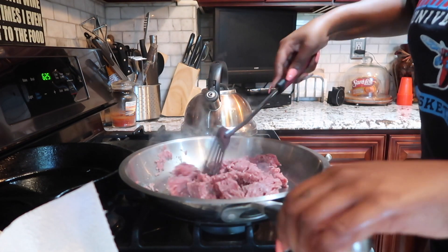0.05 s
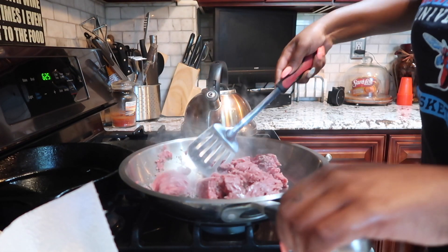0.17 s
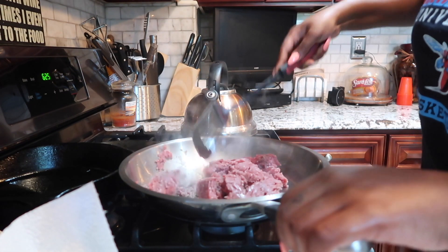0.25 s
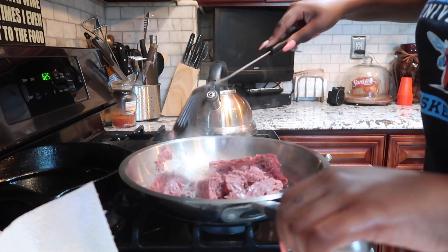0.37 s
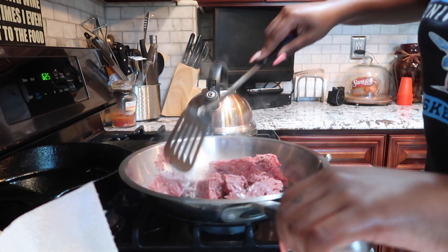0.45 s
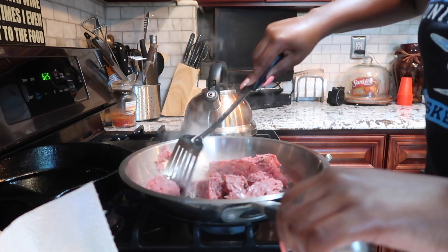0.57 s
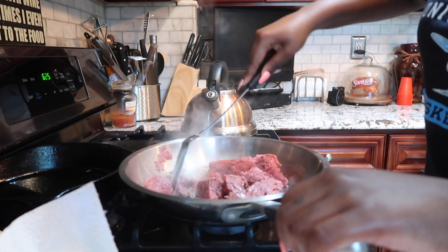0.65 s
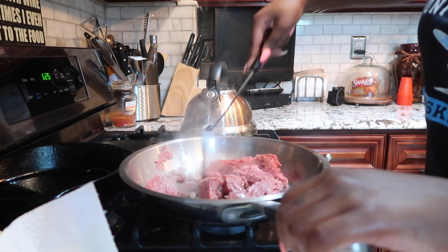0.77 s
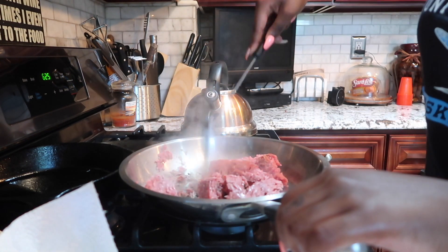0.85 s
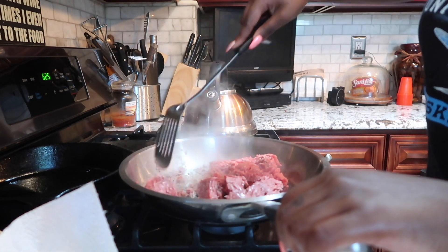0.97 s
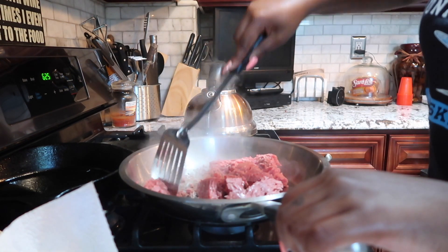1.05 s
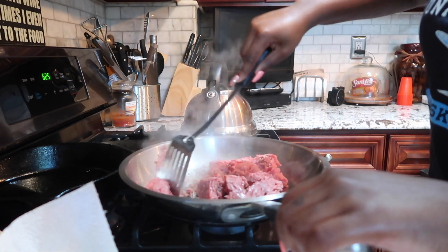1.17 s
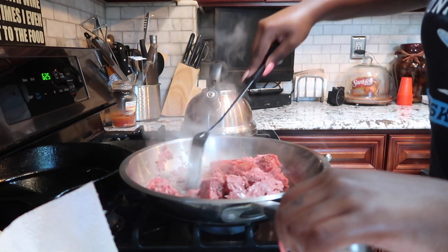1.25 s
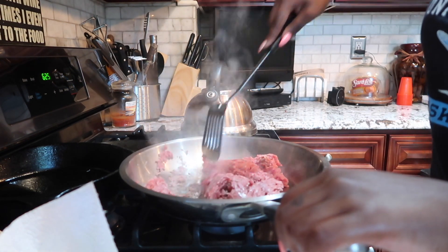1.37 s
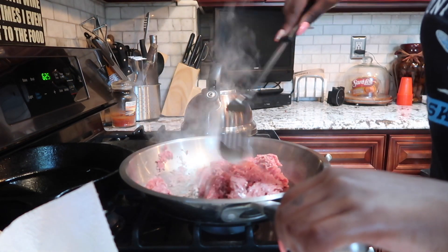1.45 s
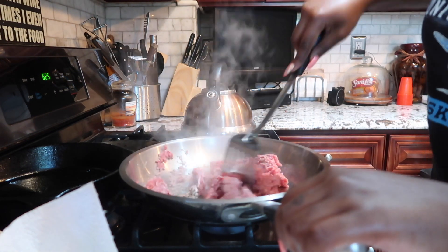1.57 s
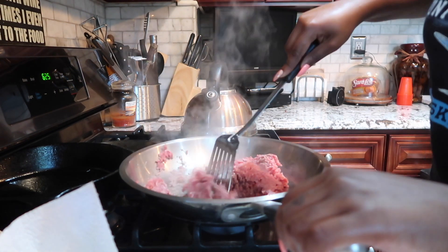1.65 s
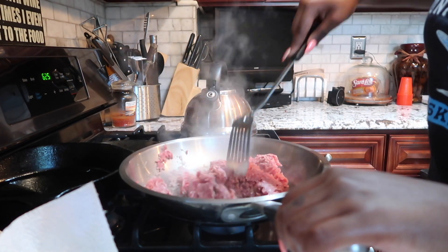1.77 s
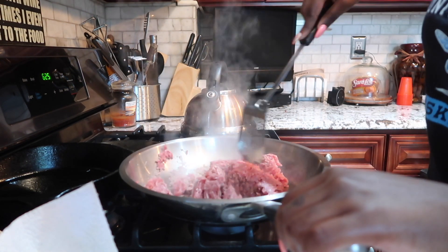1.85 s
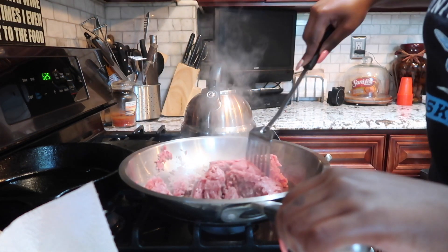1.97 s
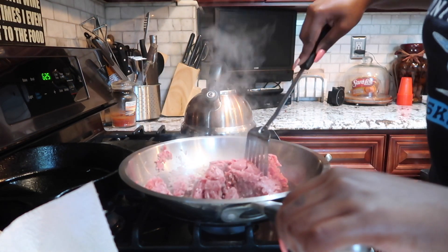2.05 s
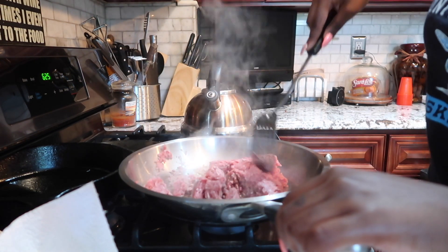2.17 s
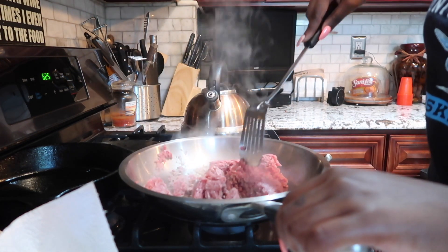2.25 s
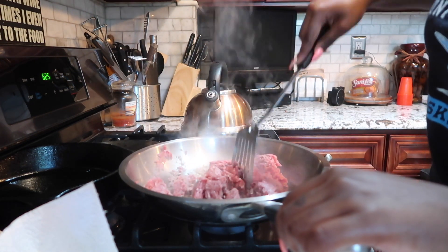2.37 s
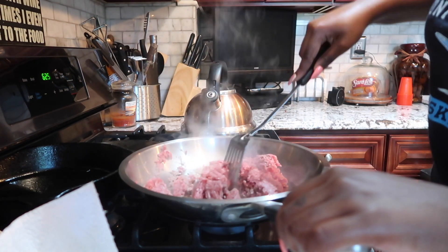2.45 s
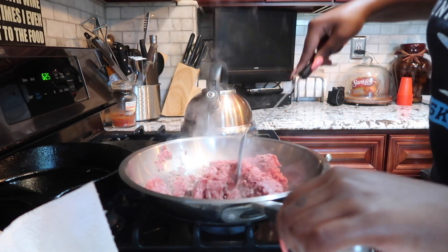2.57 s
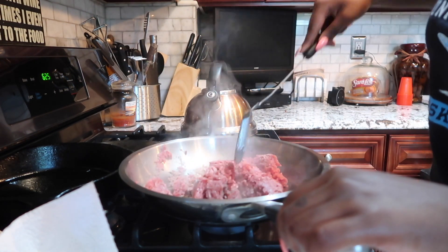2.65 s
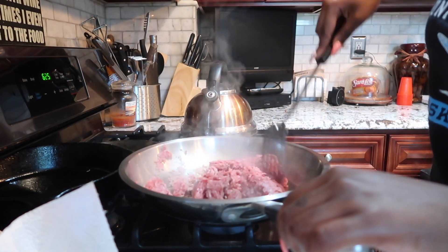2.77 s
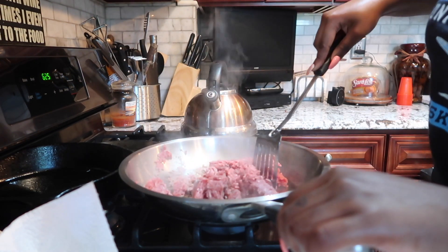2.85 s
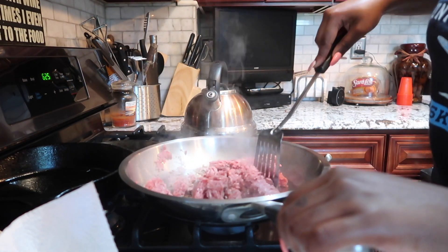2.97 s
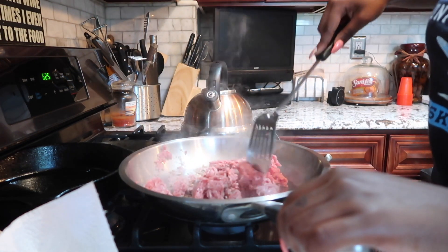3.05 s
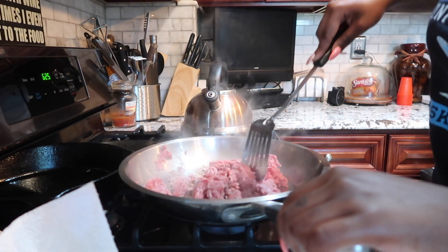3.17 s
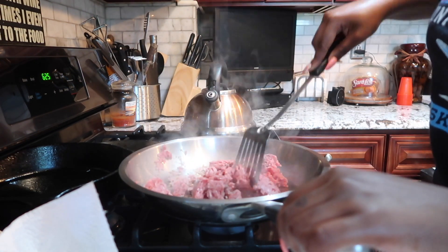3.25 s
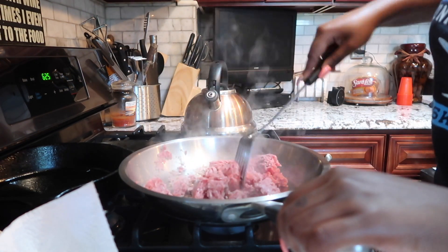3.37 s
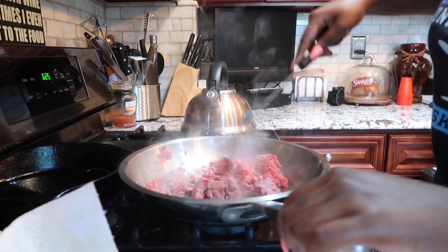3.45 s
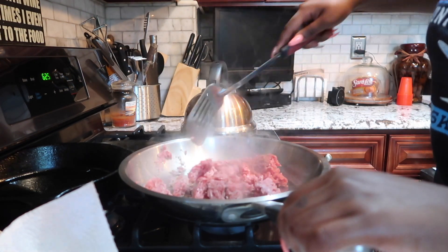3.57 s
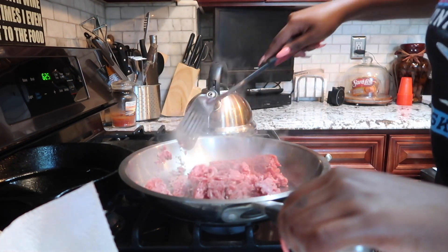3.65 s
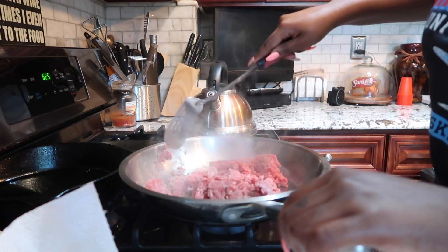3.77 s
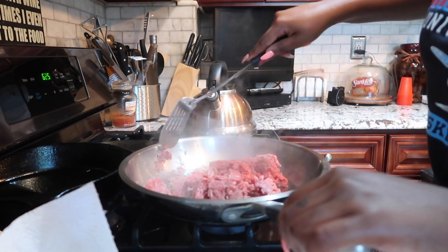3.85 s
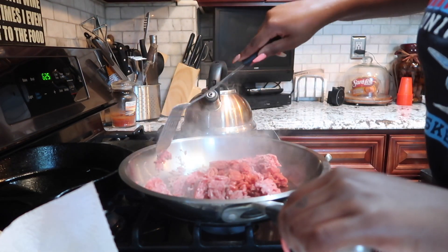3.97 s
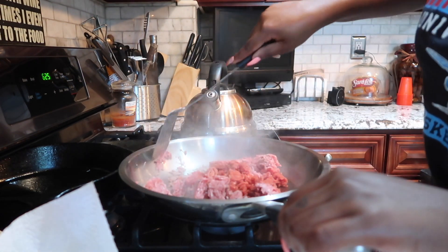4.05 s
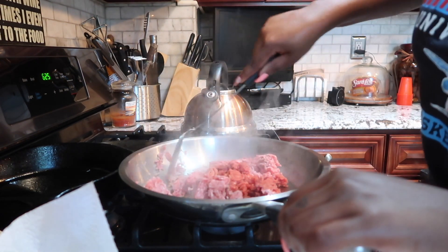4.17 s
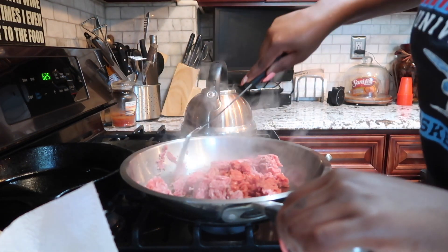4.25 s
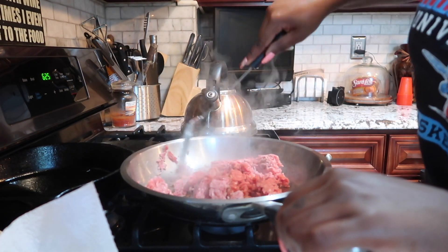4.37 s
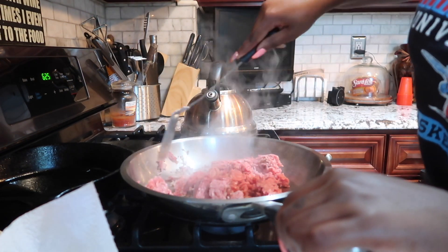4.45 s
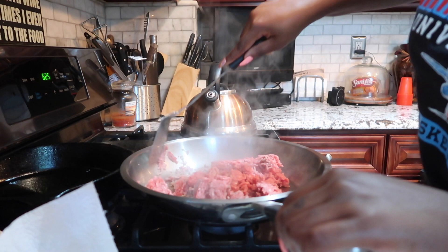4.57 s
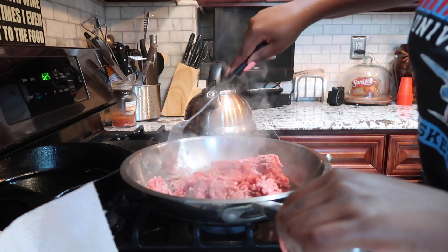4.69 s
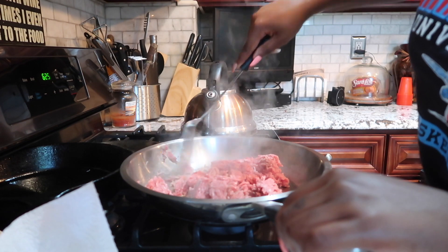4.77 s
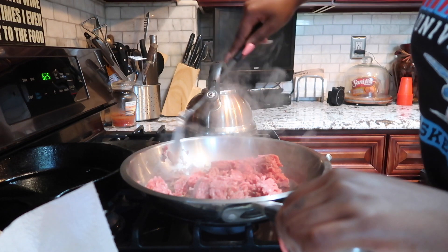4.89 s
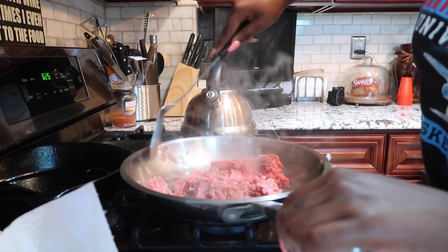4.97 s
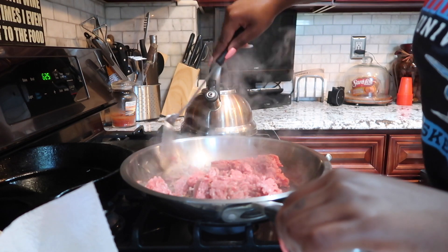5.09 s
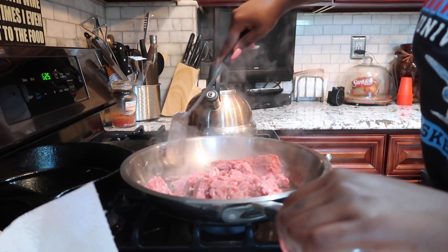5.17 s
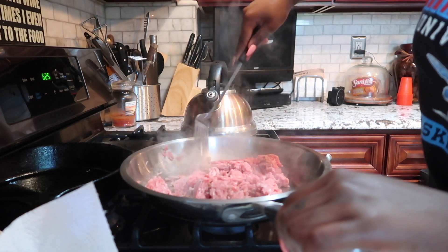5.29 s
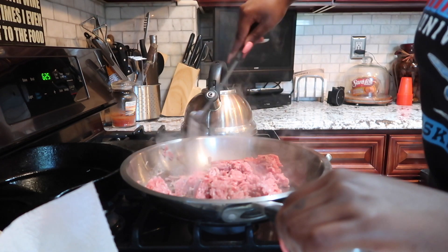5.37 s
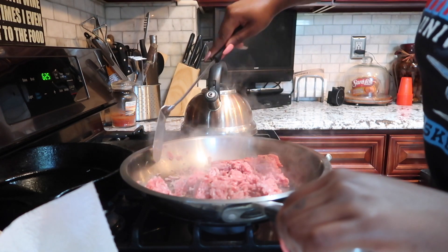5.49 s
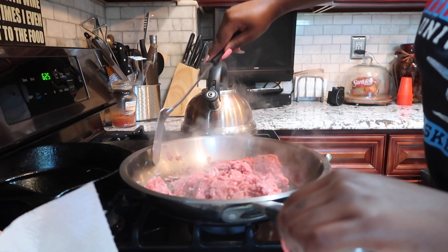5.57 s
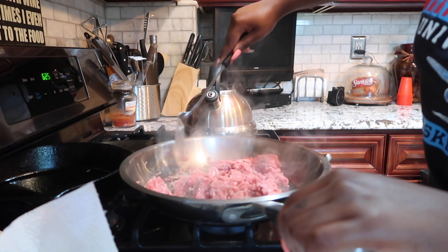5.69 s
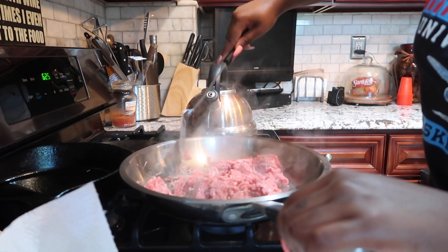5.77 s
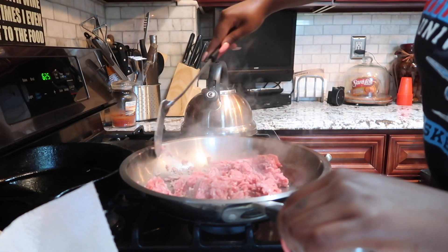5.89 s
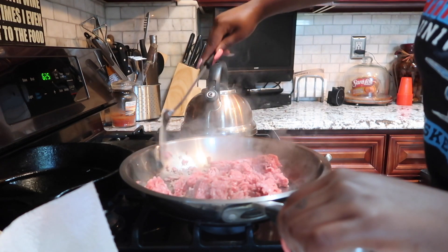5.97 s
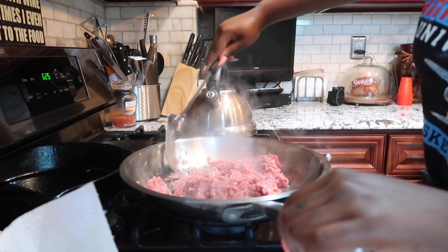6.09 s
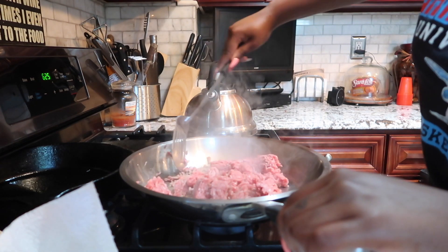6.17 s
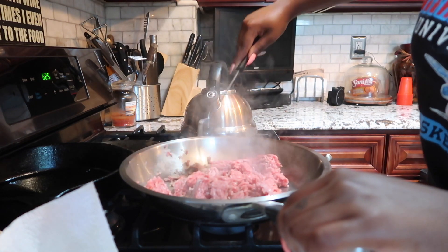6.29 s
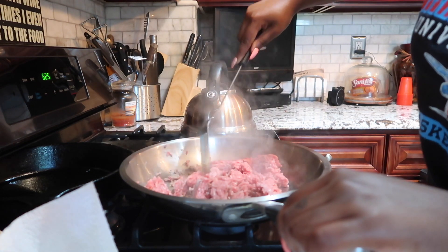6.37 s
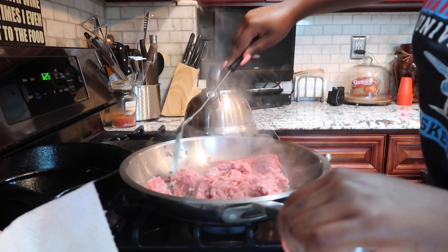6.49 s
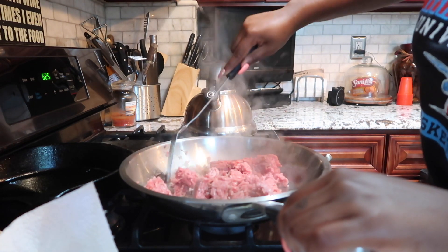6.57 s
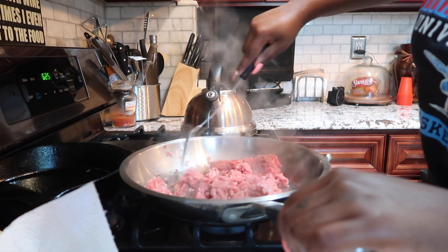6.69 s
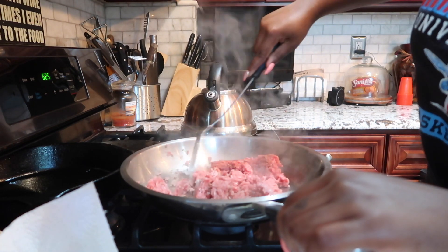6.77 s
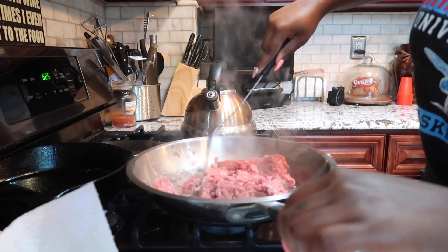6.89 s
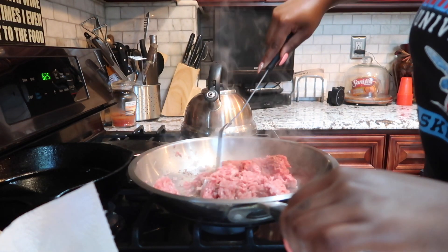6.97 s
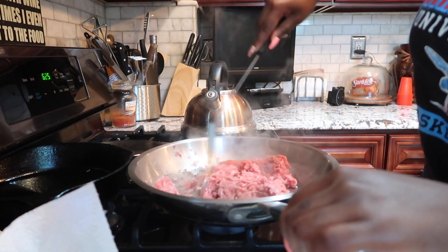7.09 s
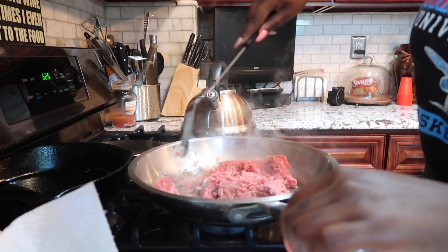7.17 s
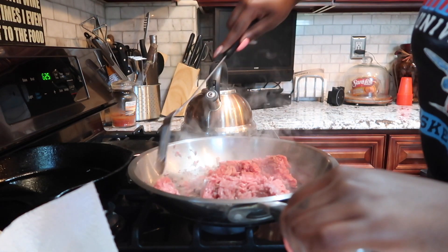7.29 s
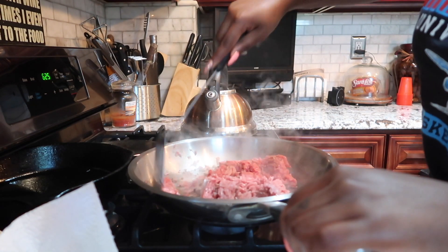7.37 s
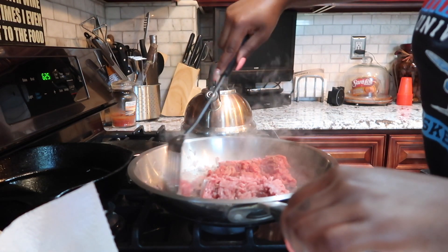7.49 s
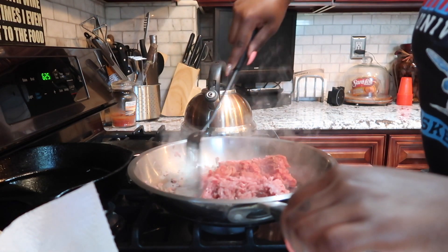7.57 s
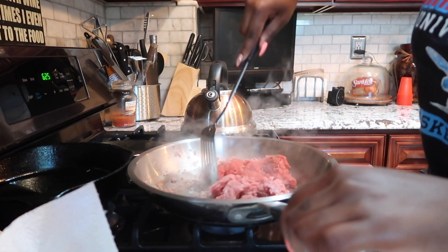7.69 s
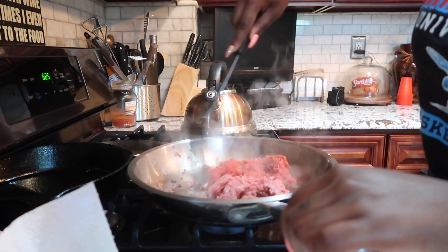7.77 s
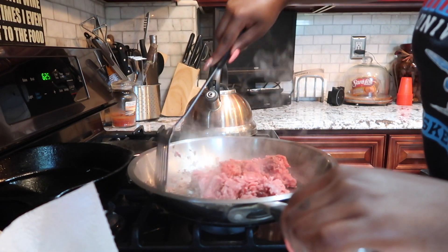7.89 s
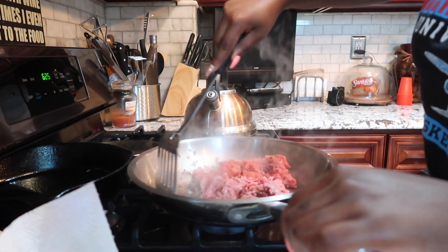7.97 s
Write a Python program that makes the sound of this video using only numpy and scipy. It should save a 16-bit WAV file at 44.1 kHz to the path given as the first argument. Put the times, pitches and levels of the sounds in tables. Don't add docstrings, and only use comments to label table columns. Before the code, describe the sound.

Close up in a home kitchen, ground meat fries with a dense, bright, crackling sizzle. A slotted metal spatula opens with a thuddy knock, chops softly into the meat, then clangs loudly on the steel pan wall and bottom. Lighter rim taps follow, then a short juddering scrape and two full knocks. A low stove rumble lies underneath; the microphone overloads on the hardest hits and the sizzle dips after them.

```python
import sys
import numpy as np
from scipy import signal
from scipy.fft import rfft, irfft
from scipy.io import wavfile
from scipy.ndimage import uniform_filter1d

SR = 44100
rng = np.random.default_rng(int(sys.argv[2]) if len(sys.argv) > 2 else 0)


def store_pcm(level_fs):
    pcm = np.round(np.clip(level_fs, -1, 1) * 32767).astype(np.int16)
    wavfile.write(sys.argv[1], SR, np.atleast_2d(pcm).T)


N = 353968

# [t/s, frying level/dB, brightness/(dB per octave), stirring level/dB]
FRYING = [(0.0, 1, -2, 11), (.3, 0.7, 0.6, -4), (.7, 1, 0.6, 0), (1.1, 0, 0.5, -1.5), (1.6, 0.4, 1, -2),
          (2.3, 0.2, 0.5, -0.2), (3.3, -0.1, 0.2, -2), (4.0, .1, 0.4, -1.5), (4.7, 0.4, 0, 1.5),
          (5.5, -1.2, 0.6, -1), (6.2, 1.5, .1, -1.5), (6.9, -1.4, 0, 4), (7.4, -0.4, -0.3, 0.3),
          (8.03, 1.9, -0.4, 1)]
# [f/Hz, level/dB per Hz]
SIZZLE_SPECTRUM = [(500, -30), (850, -23), (1060, -9.5), (1380, -13.5), (1780, -3), (1990, -4), (2300, 1),
                   (2760, -1), (3570, -1), (8670, -15), (12500, -18.5), (14400, -20), (15500, -34)]

# [t/s, peak level/dB, depth of thud/dB, wall ring f/Hz, blade ring f/Hz]
BOTTOM_BLOWS = [
    (0.0, -7.5, 9, 1360, 2230),
    (2.039, -6, -26, 1450, 2870),
    (2.052, -7, -28, 1940, 2880),
    (2.5, -4, -10, 1350, 2920),
    (2.897, 0.2, -41, 1440, 2360),
    (3.406, -20.5, 4, 1370, 2670),
    (7.514, -14.5, -17, 1520, 2660),
]
MEAT_BLOWS = [
    (0.391, -13.5, -24, 1630, 2380),
    (0.565, -13.5, -15, 2090, 2360),
    (0.639, -12.5, 1, 2110, 2560),
    (0.768, -16, -7, 1680, 2330),
    (1.349, -20, 3, 1440, 3010),
    (1.646, -10, -23, 1700, 2400),
    (5.608, -19, -2.1, 2040, 2110),
    (6.729, -18.5, -15, 1860, 2760),
]
WALL_BLOWS = [
    (0.831, -4, -6, 1750, 2700),
    (1.187, -0.5, -11, 2090, 2260),
    (1.663, 6, -27, 1757, 2600),
    (6.638, 0.5, -1, 1800, 2280),
    (7.007, 2, -0.5, 1736, 2240),
    (7.646, -14.5, -9, 1740, 2400),
]
SLOPE_BLOWS = [
    (6.01, -19, -20, 1770, 2370),
    (6.189, -15, -16, 1790, 2660),
    (6.318, -10, -31, 1860, 2180),
    (6.351, -5, -20, 1788, 2210),
    (6.387, -10.5, -14, 1925, 2520),
]
RIM_BLOWS = [
    (4.111, -15, -24, 1285, 3160),
    (4.254, -11.5, -6, 1370, 2560),
    (4.655, -6.5, -7, 1270, 2350),
    (5.087, -1, -33, 1984, 2940),
    (7.488, -6, -17, 1556, 2730),
    (8.017, -7.5, 0, 1250, 2620),
]
BLOWS = dict(bottom=BOTTOM_BLOWS, meat=MEAT_BLOWS, wall=WALL_BLOWS, slope=SLOPE_BLOWS, rim=RIM_BLOWS)
LANDINGS = {"bottom": [(520, 685, 3480, 4720), (-3, -4.5, 2.5, 1.1, -8), (-4, -6, .021, 0.72)],
            "meat": [(270, 740, 3600, 4850), (-14, -13, 6, -4.5, -13), (-11, -3, 0.03, 0.5)],
            "wall": [(500, 660, 3400, 4670), (-7.5, -2.5, 0.2, -2, -8), (-6.5, -2.5, 0.02, 0.52)],
            "slope": [(470, 660, 3660, 4400), (-29, 7, -11, 1.5, -17), (-7, -1.5, 0, 0.74)],
            "rim": [(480, 1080, 3650, 4650), (-25.5, 0.5, 3, 0, -5.5), (-6.5, -2.5, 0.0335, 0.78)]}
# [f/Hz, level/dB, t60/s]
PAN_MODES = [(164, -9, 0.28), (240, -2, 0.058), (338.3, 0, 0.74), (490, -15.5, 0.66), (531, -0.5, 0.7),
             (645, 0.5, 0.83), (684, -5, 1), (873, 0.5, 0.25), (1100, -36, 0.17), (1350, -13, 0.25),
             (1337, -4, 0.62), (1424, 0.5, 0.76), (1650, -25, 0.04), (1756, 4.5, .22), (1810, 5.5, 0.33),
             (2090, -7.5, 0.041), (2292, 6.5, 0.16), (2435, -10, 0.073), (2700, -18.5, 0.067),
             (2670, -6.5, 0.43), (3010, 8, 0.1), (3070, -23, 0.083), (3310, 7.5, 0.079), (3340, 2, 0.11),
             (3520, 12.5, 0.033), (4100, 9, 0.35), (4690, -15, 0.16), (5390, 5.5, 0.29), (6790, 3, 0.061),
             (6800, -25, 0.22)]
PLACE_T60 = [0.11, 0.14, 0.53, 0.12, 0.24, 0.23]
# [f/Hz, level/dB per Hz]
CRACK_SPECTRUM = [(150, 4.5), (500, -18), (1500, 0.5), (3200, -1.5), (6000, -6), (12000, -33), (16000, -44)]
# [t/s, level/dB]
DRAGS = [
    [(0.5, -44), (0.668, -25), (0.678, -16), (0.722, -47), (0.776, -34), (0.82, -41)],
    [(5.7, -52), (5.73, -23), (5.918, -43), (6.008, -37), (6.016, -26.5), (6.186, -31.5), (6.204, -21.5),
     (6.31, -32)],
    [(7.55, -21), (7.564, -34), (7.666, -27.5), (7.776, -33), (7.78, -41)],
]
# [t/s, level/dB]
RASP_LEVEL = [
    (6.3, -36),
    (6.312, -47),
    (6.32, -22),
    (6.336, -21),
    (6.354, -14.5),
    (6.45, -37),
]
# [f/Hz, level/dB]
JUDDER_MODES = [(660, -7.5), (1370, -9), (1790, 2), (1950, 1.5), (2160, -3), (3380, -8), (3680, 0)]

# [f/Hz, level/dB per Hz]
STOVE_SPECTRUM = [(53, -39), (90, -2), (129, -10), (178, -1), (221, -3), (255, -0.5), (368, -7),
                  (668, -0.5), (839, -7.5), (1200, -1.5), (1560, -6.5), (2640, -120)]
# [f/Hz, level/dB, t60/s]
HUM_MODES = [(172, -6.5, 0.21), (261.4, -7, 0.36), (343.5, -7.5, 0.21), (519.5, -6.5, 0.18),
             (682.3, -1, 0.19), (1056, -5, 0.54)]
# [f/Hz, side minus mid level/dB]
PORT_WIDTH = [(60, -33), (110, -36), (200, -19.5), (380, -18.5), (700, -20.5), (1290, -19.5), (2380, -21.5),
              (4400, -7), (8120, 1.5), (15000, 3)]
# [t/s, gain it falls to/dB]
DUCKS = [(0.0, -29.5), (.835, -27), (1.19, -30), (1.668, -42.5), (2.045, -40.5), (2.505, -40.5), (2.9, -42),
         (4.66, -30), (5.091, -35), (6.355, -27.5), (6.64, -29), (7.01, -35.5)]

KITCHEN_T60_S, KITCHEN_DB = 0.3, -11.5
DUCK_S, CREEP_DB_PER_S = 0.026, 7
HUM_DB, RUMBLE_DB = -15.5, -31.5
JOLT_HUM_DB, JOLT_HUM_S, JOLT_RUMBLE_DB, JOLT_RUMBLE_S = -34, 0.087, -47, 0.025


def sizzle(bright_db, per_s, spread_db, steam, patchy_db):
    out, gust = np.zeros((2, N)), drift(9.0)
    edges = 600 * 2 ** np.arange(0, 4.9, 1 / 3)
    bursts = grains(per_s * from_db(1.5 * gust), spread_db)
    dealt = rng.integers(0, 3, N)
    signs = rng.choice([-1, 1], (2, N))
    hiss = rng.standard_normal((2, 2, N))
    for k, (low, high) in enumerate(zip(edges, edges[1:])):
        force = np.sqrt(3) * bursts * (dealt == k % 3) * signs + steam * hiss[k % 2]
        hz = np.sqrt(low * high)
        tilt_db = bright_db * np.log2(hz / 3000)
        gain_db = at_hz(SIZZLE_SPECTRUM, hz) + tilt_db + patchy_db * (0.1 * gust + drift(29.0))
        out += from_db(gain_db) * band_pass(force, low, high)
    return two_ports(*out) / np.std(out[0])


def spits(per_s, cycles):
    pitches, dealt = np.geomspace(2000, 14000, 22), rng.integers(0, 22, N)
    clicks = grains(per_s, 3.24) * rng.choice([-1, 1], (2, N))
    out = np.zeros((2, N))
    for k, hz in enumerate(pitches):
        out += from_db(at_hz(SIZZLE_SPECTRUM, hz)) * hz * ring(clicks * (dealt == k), hz, cycles / hz)
    return two_ports(*out) / np.std(out[0])


def spatula(gain_db, scrape_db):
    t, out = np.arange(round(0.3 * SR)) / SR, np.zeros(N + SR)
    gain_db = np.r_[gain_db, np.full(SR, gain_db[-1])]
    for place, rows in BLOWS.items():
        for row in rows:
            i = round(row[0] * SR)
            span = slice(i, i + len(t))
            out[span] += blow(t, row, LANDINGS[place], others_db=-6) * from_db(gain_db[span] - gain_db[i])
    sound = out[:N] + from_db(scrape_db) * scrape()
    return signal.sosfilt(signal.butter(3, 270, "highpass", fs=SR, output="sos"), sound)


def blow(t, row, landing, others_db):
    _, db, thud_db, wall_hz, blade_hz = row
    place_hz, place_db, (crack_db, chatter_db, chatter_s, kept) = landing
    chance, rough = rng.standard_normal((2, len(PAN_MODES))), rng.standard_normal(len(t))
    own_hz = [*place_hz[:2], wall_hz, blade_hz, *place_hz[2:]]
    own_db = [thud_db, *place_db]
    place = [(0.9 * own_hz[0], own_db[0] - 3), *zip(own_hz, own_db)]

    pan_hz, pan_db, pan_t60 = np.transpose(PAN_MODES)
    pan_hz = pan_hz * (1 + 0.012 * chance[1])
    pan_db = pan_db + others_db + 2.5 * chance[0] + at_hz(place, pan_hz)
    twins = np.multiply(own_hz, 1 + 0.0289 * chance[1, :6])
    hz = np.r_[pan_hz, own_hz, twins]
    level_db = np.r_[pan_db, own_db, np.add(own_db, -2.5)]
    t60 = max(kept, 0.1) * np.r_[pan_t60, PLACE_T60, PLACE_T60]

    chatter = rough * np.exp(-(t / max(chatter_s, 0.001)) ** 2)
    force = from_db(chatter_db) * chatter / np.sqrt(SR * 0.0018)
    force[0] += 1
    f = np.fft.rfftfreq(len(t), 1 / SR)
    drive = np.sqrt(uniform_filter1d(np.abs(rfft(force)) ** 2, size=7))
    share = from_db(level_db) / np.interp(hz, f, drive)
    modes = share @ (np.sin(2 * np.pi * np.outer(hz, t)) * 1000.0 ** (-t / t60[:, None]))
    rung = signal.fftconvolve(modes, force)[:len(t)]
    rung *= 1 + 0.5 * np.exp(-t / 0.025)

    snap = irfft(rfft(rough[::-1]) * from_db(at_hz(CRACK_SPECTRUM, f) + at_hz(place, f)), len(t))
    wash = from_db(-17) * np.exp(-t / 0.047)
    snap = rms_one(snap) * (np.exp(-t / 0.004) + wash) * np.minimum(t / 0.0011, 1)
    return from_db(db) * (rung / np.abs(rung).max() + from_db(crack_db) * snap)


def scrape():
    drag = sum(from_db(in_time(rows, left=-120, right=-120)[0]) for rows in DRAGS)
    stick_slip = grains(800, 5.8) * rng.choice([-1, 1], N)
    rung = np.zeros(N)
    for hz, db, t60 in PAN_MODES[2:25]:
        rung += from_db(db + 3 * drift(8)) * ring(stick_slip, hz, 0.35 * t60)
    return drag * rms_one(rung)


def rasp():
    slips = grains(2500, 2.7) * rng.choice([-1, 1], N)
    judder = rms_one(sum(from_db(db) * ring(slips, hz, 0.14) for hz, db in JUDDER_MODES))
    return from_db(in_time(RASP_LEVEL, left=-120, right=-120)[0]) * judder


def kitchen(x):
    t = np.arange(round(0.5 * SR)) / SR
    fade = 1000.0 ** (-t / KITCHEN_T60_S) * np.minimum(t / 0.031, 1)
    tails = rng.standard_normal((2, len(t))) * fade
    mid, side = signal.fftconvolve(tails / np.linalg.norm(tails[0]), x[None], axes=1)[:, :N]
    return two_ports(mid, side)


def stove(pan_db):
    mid, side, shake = rng.standard_normal((3, N))
    hum = np.zeros(N)
    for hz, db, t60 in HUM_MODES:
        hum += from_db(db + 2.0 * drift(2.4)) * rms_one(ring(shake, hz, t60))
    mid, side = coloured(mid, STOVE_SPECTRUM), coloured(side, STOVE_SPECTRUM)
    lumpy = from_db(0.9 * drift(14.0))
    return lumpy * two_ports(mid, side) / np.std(mid) + from_db(pan_db) * hum


def rumble(side_db):
    mid, side = band_pass(rng.standard_normal((2, N)), 22, 75)
    return (mid + from_db(side_db) * side * [[1], [-1]]) / np.std(mid)


def jolts(decay_s):
    kicks, r = np.zeros(N + SR), np.exp(-2 / (decay_s * SR))
    for s, db, thud_db, *_ in sum(BLOWS.values(), []):
        kicks[round(s * SR)] = from_db(2 * (db + 0.4 * thud_db))
    return signal.lfilter([1], [1, -r], kicks[:N])


def gain_control():
    t, (s, db) = np.arange(N) / SR, np.transpose(DUCKS)
    last, r = np.maximum(np.searchsorted(s, t) - 1, 0), np.exp(-1 / (DUCK_S * SR))
    aim = db[last] + CREEP_DB_PER_S * (t - s[last])
    return signal.lfilter([1 - r], [1, -r], aim, zi=[r * (aim[0] + 2.3)])[0]


def two_ports(mid, side):
    return mid + coloured(side, PORT_WIDTH) * [[1], [-1]]


def ring(force, hz, t60):
    r, w = from_db(-60 / (t60 * SR)), 2 * np.pi * hz / SR
    return signal.lfilter([0, np.sin(w)], [1, -2 * r * np.cos(w), r * r], force + 1e-18)


def grains(per_s, spread_db):
    sizes = from_db(spread_db * np.minimum(rng.exponential(1, N), 6))
    return rms_one(sizes * (rng.random(N) < per_s / SR))


def drift(rate):
    r = np.exp(-80 * np.pi * rate / SR)
    slow = signal.lfilter([1], [1, -2 * r, r * r], rng.standard_normal(N // 40 + 2002))[2000:]
    return np.interp(np.arange(N) / 40, np.arange(len(slow)), rms_one(slow))


def band_pass(x, low, high):
    return signal.sosfilt(signal.butter(2, [low, high], "band", fs=SR, output="sos"), x)


def coloured(x, points):
    return irfft(rfft(x) * from_db(at_hz(points, np.fft.rfftfreq(N, 1 / SR))), N)


def at_hz(points, hz):
    points = np.array(points)
    return np.interp(np.log(hz + 1e-9), np.log(points[:, 0]), points[:, 1])


def in_time(rows, **ends):
    s, *columns = np.transpose(rows)
    return [np.interp(np.arange(N) / SR, s, c, **ends) for c in columns]


def from_db(db):
    return 10 ** (np.asarray(db) / 20)


def rms_one(x):
    return x / np.sqrt(np.mean(x ** 2) + 1e-20)


def scene():
    gain_db, (fry_db, bright_db, stir_db) = gain_control(), in_time(FRYING)
    fry = from_db(gain_db + fry_db + 0.87) * sizzle(bright_db, per_s=9000, spread_db=0.5, steam=1.0,
                                                    patchy_db=0.92)
    fry += from_db(gain_db + fry_db - 7.5) * spits(per_s=3300, cycles=94.0)

    knocks = spatula(gain_db, scrape_db=-8.5) + rasp()
    blade = two_ports(knocks, signal.hilbert(knocks).imag)

    hum_db = gain_db + stir_db + HUM_DB
    hum = np.sqrt(from_db(2 * hum_db) + from_db(2 * JOLT_HUM_DB) * jolts(JOLT_HUM_S))
    shake_db = gain_db + stir_db + RUMBLE_DB + 4.7 * drift(3.0)
    shake = np.sqrt(from_db(2 * shake_db) + from_db(2 * JOLT_RUMBLE_DB) * jolts(JOLT_RUMBLE_S))
    ground = hum * stove(pan_db=-6.0) + shake * rumble(side_db=-19)
    return fry + blade + from_db(KITCHEN_DB) * kitchen(knocks) + ground


def band_limit(x):
    return signal.sosfilt(signal.butter(12, 15690, fs=SR, output="sos"), x)


def record(dry):
    mix = np.clip(dry, -0.99, 0.99)
    return band_limit(mix)


dry = scene()
out = record(dry)
store_pcm(out)
```